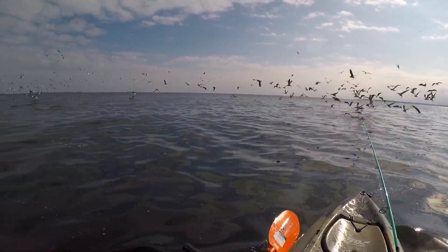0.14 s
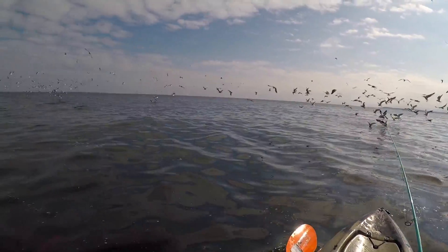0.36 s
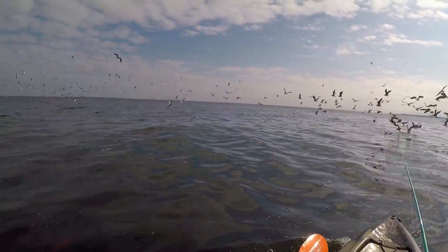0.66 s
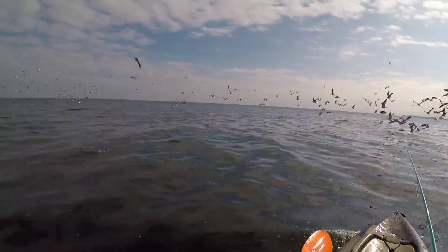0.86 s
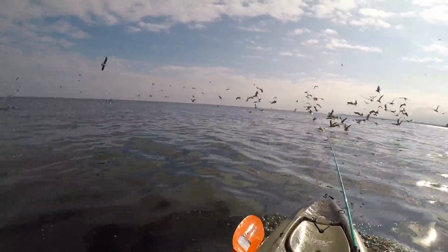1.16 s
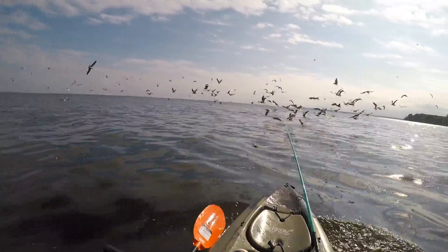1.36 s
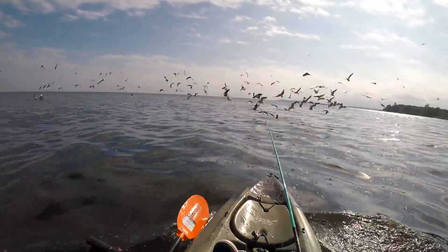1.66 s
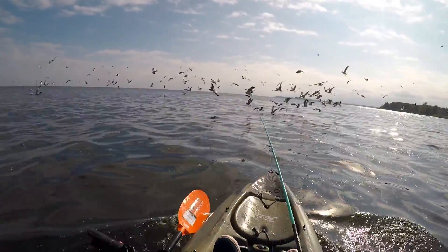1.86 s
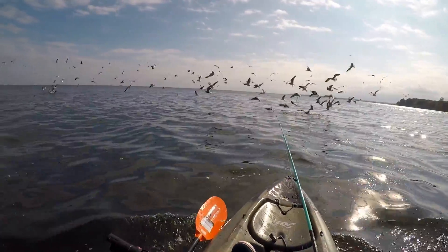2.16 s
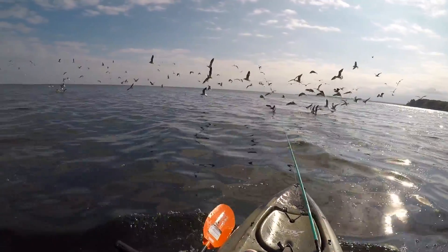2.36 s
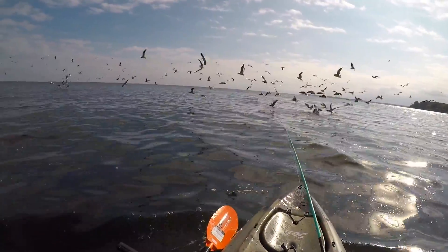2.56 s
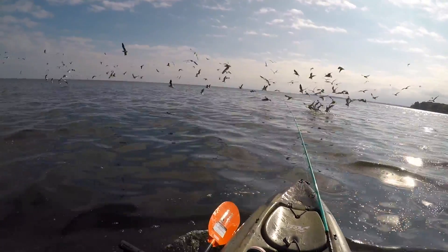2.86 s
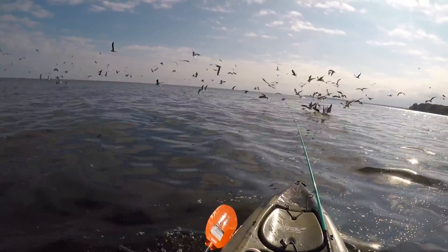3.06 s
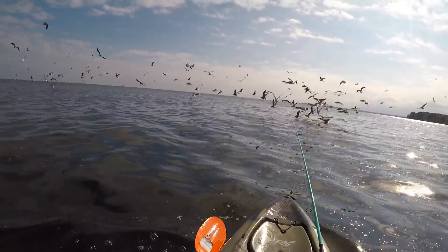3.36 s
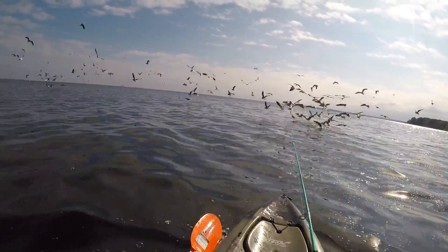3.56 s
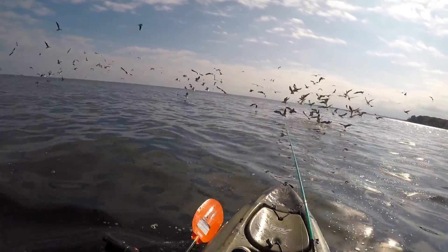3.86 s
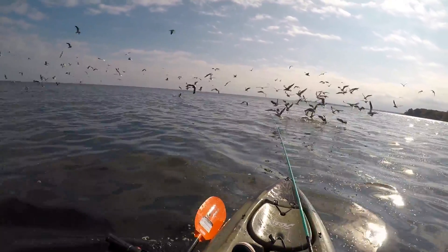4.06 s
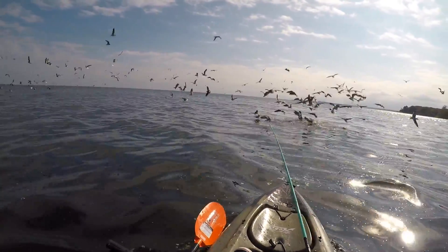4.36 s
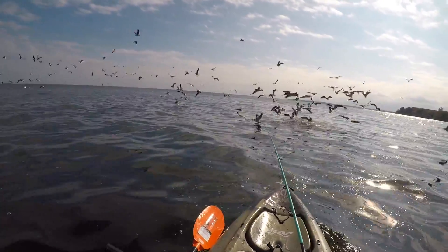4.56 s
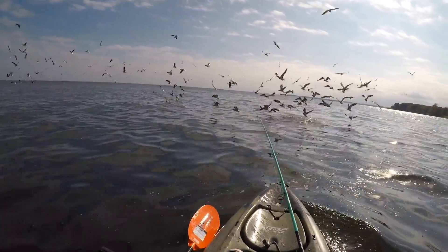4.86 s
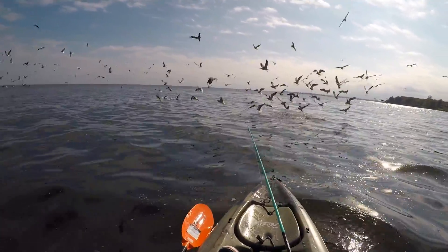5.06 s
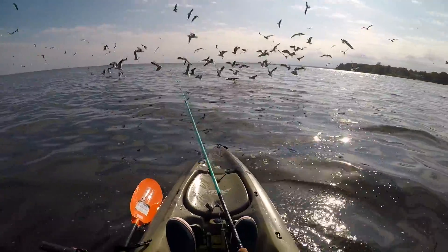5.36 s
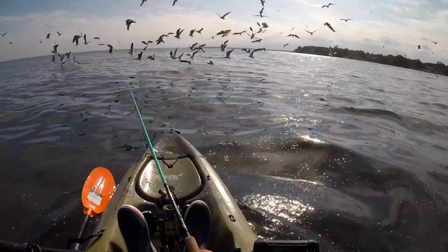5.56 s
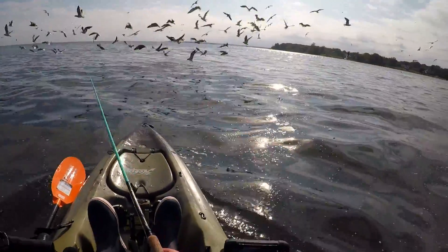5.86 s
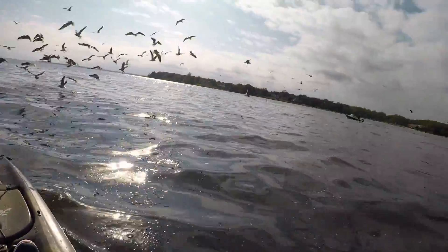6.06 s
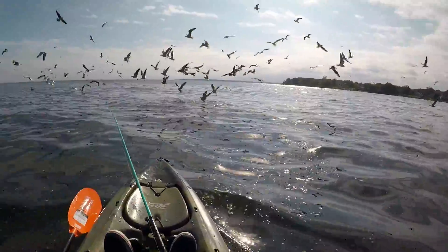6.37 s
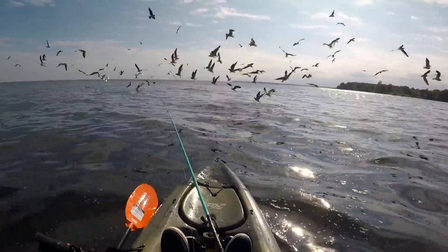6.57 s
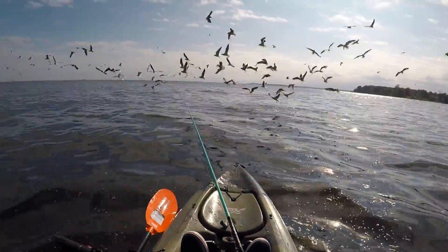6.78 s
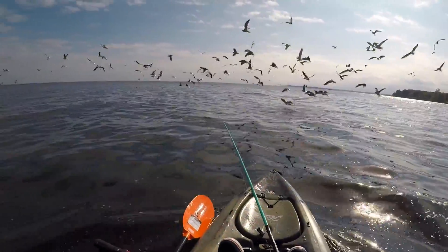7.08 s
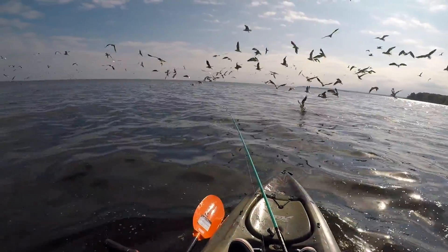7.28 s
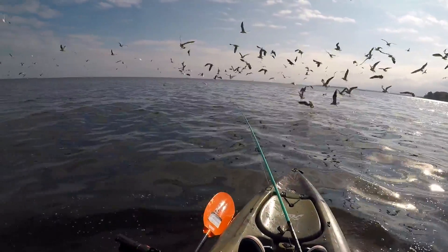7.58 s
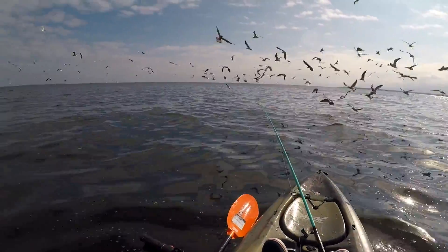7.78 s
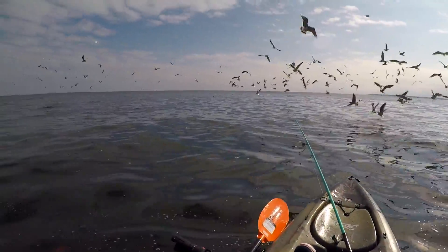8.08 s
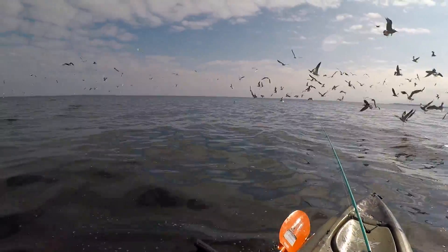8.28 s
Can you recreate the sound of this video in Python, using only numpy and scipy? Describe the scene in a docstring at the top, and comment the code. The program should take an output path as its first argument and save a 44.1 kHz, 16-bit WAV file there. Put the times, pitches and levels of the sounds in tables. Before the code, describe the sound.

A feeding flock of gulls calls continuously over open water, heard from a small boat. Short raspy squawks, piercing squeals and wavering cries overlap nearby, while many fainter birds blur into a swelling chorus behind. Low wind rumble and brief buffeting puffs press on an enclosed microphone, slightly muffling the treble. Faint watery hiss and a few soft hull knocks sit underneath.

```python
"""Gulls cry and rasp close by, over a blurred chorus of the far flock on open water, from a small boat.
Cries are stacks of gliding partials; rasps are uneven pulses ringing the throat; many weak notes of
both kinds make the chorus. Chop and wings are shaped noise, and tackle knocks ring the hull now and then.
Wind rumbles and buffets the two ports of a sealed microphone with noise partly shared, in opposite sense."""
import sys
import numpy as np
from scipy import signal
from scipy.fft import rfft, irfft, next_fast_len
from scipy.io import wavfile
from scipy.ndimage import uniform_filter1d

SR = 44100
rng = np.random.default_rng(int(sys.argv[2]) if len(sys.argv) > 2 else 0)


def ratio_of_db(decibels):
    """Turn decibels (scalar or array-like) into linear amplitude factors; 0 dB maps to 1."""
    return 10 ** (np.asarray(decibels, float) / 20)


def persist_wave(psi):
    """Save psi, clipped to +-1, as 16-bit WAV."""
    counts = np.round(np.clip(psi, -1, 1) * 32767).astype(np.int16)
    wavfile.write(sys.argv[1], SR, np.atleast_2d(counts).T)


N = 371760  # samples in the scene
T = np.arange(N) / SR

# Levels in the bird tables are set ahead of the voice, throat, housing and port colours.
# full-voiced glides: start t/s, length t/s, first f/Hz, last f/Hz, level/dB
FULL_CRIES = [(0.007, 0.06, 1183, 1074, -44.5), (0.328, 0.11, 3500, 3155, -49),
              (0.773, 0.14, 3290, 3320, -50.5), (0.91, 0.12, 1106, 1085, -55.5),
              (1.124, 0.083, 1084, 1080, -48), (1.329, 0.21, 1174, 1076, -54.5),
              (2.175, 0.14, 1065, 1070, -49), (2.456, 0.038, 463, 496, -50.5),
              (2.667, 0.3, 2050, 2120, -56), (3.395, 0.051, 1100, 1130, -53.5),
              (3.728, 0.063, 1920, 2087, -66), (3.817, 0.12, 2160, 2400, -67),
              (4.588, 0.045, 533, 550, -69), (4.73, 0.028, 2368, 2353, -45.5),
              (4.352, 0.036, 529, 577, -56), (4.44, 0.049, 524, 590, -64), (4.909, 0.031, 540, 590, -63),
              (6.567, 0.12, 2780, 2610, -63), (6.93, 0.027, 560, 635, -46),
              (7.007, 0.0312, 1594, 1610, -49), (7.129, 0.12, 3110, 3145, -50.5),
              (7.13, 0.052, 1190, 1155, -56), (7.231, 0.034, 3180, 2910, -39.5),
              (7.463, 0.027, 2340, 2320, -58), (7.472, 0.029, 560, 623, -49.5),
              (7.896, 0.11, 1133, 1070, -53), (8.068, 0.13, 1534, 1530, -59),
              (8.199, 0.065, 1143, 1087, -53.5), (8.283, 0.057, 1484, 1380, -65)]
# single gliding lines, thin whistles and lone strong overtones of fuller cries:
# start t/s, length t/s, first f/Hz, last f/Hz, level/dB
SINGLE_LINES = [(.055, 0.037, 3290, 3160, -45.5), (.1, 0.23, 4800, 4700, -53),
                (.4, 0.11, 2200, 2037, -45.5), (.515, 0.05, 2510, 2366, -49.5),
                (.83, 0.21, 4430, 4680, -49), (.85, 0.29, 2297, 2410, -47.5),
                (1.225, 0.088, 1915, 2150, -39.5), (1.28, 0.039, 4700, 4500, -41),
                (1.31, 0.045, 3553, 3540, -35), (1.32, 0.067, 5870, 5940, -42.5),
                (1.345, 0.038, 4600, 4130, -44), (1.849, 0.1, 2500, 2150, -49),
                (2.015, 0.17, 1957, 1840, -44), (2.18, 0.077, 2400, 2350, -46.5),
                (2.264, 0.042, 3109, 3230, -39.5), (2.961, 0.014, 4200, 4500, -44),
                (3.019, 0.2, 2153, 2077, -46), (3.03, 0.045, 4478, 4470, -53),
                (3.126, 0.15, 2133, 2380, -46.5), (3.135, 0.082, 5710, 5730, -43),
                (3.378, .02, 3000, 2230, -49), (3.4, 0.038, 2190, 2230, -44),
                (3.455, 0.05, 1402, 1360, -49), (3.485, 0.024, 3120, 3450, -45),
                (3.495, 0.045, 2950, 1886, -46), (2.17, 0.15, 5650, 5240, -49),
                (2.17, 0.086, 7050, 6840, -47), (1.645, 0.017, 2500, 2970, -56),
                (1.118, 0.07, 3750, 3650, -47), (1.125, .03, 3150, 3180, -47),
                (7.41, 0.029, 2950, 3000, -48), (2.575, .11, 4880, 4850, -58),
                (2.66, .065, 3200, 3400, -50), (4.77, 0.079, 6850, 7300, -42.5),
                (4.85, .1, 7250, 7250, -48), (5.09, .03, 7000, 6600, -43), (1.13, 0.024, 6200, 6500, -55),
                (1.18, 0.023, 4200, 4600, -43), (1.23, .025, 4600, 4750, -47),
                (1.26, 0.024, 3300, 3570, -42), (1.56, 0.019, 2500, 3330, -54),
                (1.62, 0.051, 1850, 1960, -49), (1.645, 0.025, 3700, 4400, -47),
                (2.53, 0.071, 2750, 2404, -56), (2.555, 0.034, 5400, 4960, -47),
                (2.63, 0.041, 3200, 2860, -50), (2.67, .3, 2060, 2145, -51), (2.71, 0.051, 5150, 5100, -52),
                (3.04, 0.12, 5600, 5925, -44.5), (3.14, 0.06, 6400, 6900, -60),
                (3.2, .095, 2280, 2367, -56), (3.23, 0.081, 3400, 3750, -57),
                (3.32, 0.026, 3000, 3330, -57), (3.385, 0.036, 5900, 5437, -45),
                (3.51, 0.029, 3300, 3020, -56), (3.515, .02, 5600, 4900, -55), (3.62, .02, 2500, 2930, -52),
                (3.79, 0.055, 2600, 2130, -57), (4.02, 0.13, 5150, 5220, -52),
                (4.05, .075, 2250, 2050, -49.5), (5.2, 0.033, 4800, 4340, -44),
                (5.21, 0.021, 3650, 3500, -42), (5.315, 0.038, 3750, 3700, -45),
                (6.445, .025, 4200, 3653, -51), (6.62, .1, 5500, 5000, -55), (6.72, 0.14, 5030, 4950, -56),
                (7.29, 0.1, 6050, 6000, -48), (.965, 0.026, 9100, 9900, -41),
                (3.814, 0.068, 3940, 3810, -52), (4.281, 0.046, 4715, 4300, -36),
                (4.49, 0.078, 3323, 3270, -40), (6.44, 0.035, 2100, 1390, -49),
                (4.499, 0.12, 4020, 3840, -46), (4.67, 0.055, 1310, 1690, -45.5),
                (4.752, 0.046, 3240, 3495, -38), (4.785, 0.19, 3580, 3660, -36.5),
                (5.001, 0.25, 4720, 4530, -45.5), (5.172, 0.081, 3670, 3400, -44.5),
                (5.228, 0.028, 4700, 4050, -36), (5.451, 0.31, 1910, 2190, -49.5),
                (5.635, 0.084, 3220, 2630, -42.5), (5.695, 0.15, 2140, 2020, -51),
                (3.295, 0.025, 2350, 1849, -48), (7.45, 0.29, 4590, 4890, -50),
                (7.72, 0.12, 2683, 2760, -45.5), (7.765, 0.058, 2950, 3400, -46),
                (8.06, 0.045, 2410, 2190, -49), (8.395, 0.043, 4050, 4240, -53)]
# wails that climb, hold and sag: start t/s, length t/s, first f/Hz, top f/Hz, level/dB
CLIMBING_WAILS = [(0.456, 0.16, 5140, 5320, -40.5), (0.772, 0.046, 560, 619, -46.5),
                  (1.591, 0.11, 4700, 4820, -46), (1.654, 0.32, 3430, 3820, -37),
                  (3.339, 0.048, 1480, 1650, -53.5), (4.791, 0.0458, 575.6, 616.5, -45),
                  (3.764, 0.05, 1190, 1324, -51), (5.578, 0.14, 4650, 4800, -48)]
# hoarse screams of smeared partials: start t/s, length t/s, first f/Hz, last f/Hz, level/dB
HOARSE_SCREAMS = [(1.172, 0.073, 1075, 1156, -38.5), (1.841, .13, 1159, 1091, -42.5),
                  (1.98, 0.097, 1100, 996, -52), (2.301, 0.16, 1150, 1097, -62),
                  (2.495, .07, 1100, 1108, -45.5), (2.833, 0.092, 1094, 1072, -46.5),
                  (2.939, 0.049, 1050, 1057, -47.5), (3.04, 0.092, 1090, 1085, -63),
                  (6.568, 0.0606, 1100, 1110, -57), (7.787, 0.103, 1150, 1150, -50),
                  (8.335, 0.094, 985, 1064, -61)]
# long wavering calls of the nearest birds, one list a call: t/s, pitch f/Hz, level/dB
WARBLE_LINES = [
    [(3.24, 3440, -70), (3.28, 3670, -72), (3.33, 3854, -64), (3.438, 3605, -66), (3.53, 3730, -71),
     (3.594, 3580, -67), (3.66, 3200, -71)],
    [(4.39, 3000, -46), (4.42, 3090, -48), (4.44, 3234, -37), (4.49, 3440, -43), (4.532, 3300, -39),
     (4.57, 3207, -86)],
    [(3.67, 3470, -63), (3.678, 3584, -46.5), (3.752, 3439, -57), (3.784, 3240, -47.5), (3.874, 3140, -53),
     (3.93, 3540, -46)],
    [(3.99, 3180, -50), (4.025, 3060, -46), (4.048, 3260, -45), (4.075, 3160, -42.5), (4.108, 3340, -45),
     (4.132, 3030, -36.5), (4.168, 3170, -41.5), (4.195, 3055, -42.5), (4.228, 3140, -43),
     (4.256, 2925, -38), (4.27, 2963, -56)],
    [(4.8, 3070, -62), (4.818, 3180, -65), (4.838, 2926, -70), (4.858, 3094, -65), (4.88, 3410, -49),
     (4.922, 2900, -63), (4.968, 3130, -57), (4.988, 3000, -42), (5.01, 2850, -70)],
    [(4.95, 3625, -66), (4.962, 3490, -40), (5.002, 3280, -37.5), (5.062, 3420, -37), (5.106, 3260, -42.5),
     (5.125, 3090, -52)],
    [(5.59, 3020, -48), (5.63, 2970, -41.5), (5.67, 3410, -41.5), (5.694, 3215, -41), (5.75, 3300, -38),
     (5.764, 3035, -38), (5.778, 3030, -39), (5.83, 2840, -45)],
    [(5.735, 2470, -43), (5.79, 2430, -44), (5.845, 2560, -39), (5.9, 2424, -39.5), (5.958, 2450, -46.5),
     (5.972, 1950, -57), (5.986, 2410, -43), (6.02, 2440, -62)],
    [(6.62, 1105, -59), (6.63, 1095, -55), (6.696, 1123, -58), (6.735, 1090, -58.5), (6.83, 1128, -51),
     (6.89, 1099, -51), (6.925, 1080, -49)],
    [(6.98, 2140, -46), (7.036, 2496, -43), (7.05, 2470, -35.5), (7.064, 2426, -39.5), (7.122, 2420, -46),
     (7.208, 2308, -35.5), (7.27, 2160, -66)],
    [(7.5, 2150, -47), (7.558, 2240, -51), (7.646, 2395, -49), (7.668, 2210, -44.5), (7.696, 2123, -38),
     (7.768, 2360, -46.5), (7.782, 2220, -46), (7.8, 2080, -55)],
    [(7.585, 2550, -68), (7.62, 2990, -51), (7.67, 3150, -50), (7.678, 2990, -52), (7.74, 2810, -46)],
    [(6.19, 4150, -57), (6.225, 4750, -45), (6.33, 4760, -53), (6.39, 4560, -50), (6.41, 4250, -45),
     (6.435, 4300, -67)],
    [(.965, 4700, -54), (.99, 5330, -39), (1.04, 5460, -36), (1.09, 5270, -39), (1.13, 4530, -42)],
    [(4.845, 6100, -37), (4.87, 6467, -38), (4.89, 6400, -43), (4.91, 5760, -37), (4.935, 5730, -45),
     (4.96, 6090, -43), (4.985, 6100, -47), (5.0, 5850, -52)],
    [(6.483, 1150, -58), (6.52, 1440, -53), (6.552, 1500, -60)],
]
# how much each warble favours its lowest partial: level/dB
WARBLE_LOWEST_DB = [14.5, -10, -7, -3.5, 4, -6, -5.5, 0, 13.5, -16, 8, 2, 3.5, -8, 0, 2]
# colour of the partials of cries, single lines and wails: f/Hz, level/dB
CRY_COLOUR = [(500, -11), (1100, -24), (1500, -1), (2200, 0.5), (3300, -0.5), (4500, 3), (6500, 5.5),
              (7600, -12), (11500, -18)]
# colour of the partials of screams: f/Hz, level/dB
SCREAM_COLOUR = [(1100, -23), (2200, -6), (3300, 1.5), (4400, -13.5), (5700, -1), (7000, -9.5),
                 (10500, -32)]
# colour of the partials of warbles: f/Hz, level/dB
WARBLE_COLOUR = [(2300, -20), (3200, 5.5), (4700, 0), (6400, -0.5), (7400, -10.5), (10500, -16),
                 (14500, -29.5)]
# harsh notes: nominal start t/s, nominal length t/s, level/dB, beak opening as treble lift/dB,
# pulse rate at the top of its arc f/Hz
HARSH_NOTES = [(0.21, 0.055, -43, -9, 615), (0.281, 0.052, -34, 2.5, 345), (0.488, 0.027, -45, 2, 678),
               (0.52, 0.068, -46, 15, 435.6), (0.761, 0.13, -46, 11, 596), (0.855, 0.044, -39, 8, 607.6),
               (0.987, 0.14, -48.5, -22, 533), (1.154, 0.16, -36, 5, 596), (1.353, 0.019, -35, -7, 759),
               (1.443, 0.14, -38.5, -0.5, 563), (1.63, 0.023, -56, -6, 347), (1.704, 0.01, -61, -7, 440),
               (1.842, 0.084, -38.5, 2, 352), (1.929, 0.041, -41, -17, 544), (1.984, 0.082, -38, -23, 610),
               (2.12, 0.049, -33.5, -3, 619), (2.294, 0.044, -32.5, -47, 559),
               (2.336, 0.1, -36.5, -45, 581), (2.509, 0.055, -35, 1.5, 431), (2.74, 0.051, -36.5, -7, 565),
               (2.832, 0.057, -33, -1, 524), (3.042, 0.11, -34.5, -5, 568), (3.204, 0.04, -36.5, -6, 398),
               (3.331, 0.084, -43.5, -21, 425), (3.493, 0.14, -41, 4, 541), (3.76, 0.049, -46, 0, 660),
               (3.927, 0.087, -34, 5, 629), (4.06, 0.12, -47, -6, 514), (4.248, 0.05, -36.5, 10, 474),
               (4.345, 0.07, -30, 8.5, 582), (4.585, 0.058, -39.5, 22, 560),
               (4.706, 0.049, -32.5, 1.5, 589), (4.875, 0.085, -32.5, 22, 362.4),
               (5.073, 0.1, -37.5, 1, 552), (5.207, 0.048, -44, 12, 778), (5.3, 0.072, -40, -4, 658),
               (5.39, 0.051, -38.5, -3, 504), (5.524, 0.069, -28.5, 8.5, 560), (5.695, 0.055, -40, 10, 643),
               (5.834, 0.028, -40, -10.5, 558), (6.041, 0.036, -41, 8, 704),
               (6.144, 0.042, -35.5, 5.5, 563), (6.39, 0.032, -39, 24, 586), (6.435, 0.027, -38, 12, 587),
               (6.562, 0.042, -43, -2, 369.5), (6.932, 0.048, -30.5, 6, 589),
               (7.042, 0.091, -42.5, 4.5, 526), (7.208, 0.068, -38, 14, 611.3),
               (7.402, 0.045, -38, 15, 595), (7.752, 0.14, -42, 7, 531), (8.028, 0.07, -46.5, 9, 529.4),
               (8.173, 0.035, -40, 3, 497), (8.354, 0.08, -36.5, 10, 560)]
# throat resonances of a bird of size 1: f/Hz, width of each of two passes f/Hz, level/dB
THROAT_RINGS = [(2150, 700, -3.5), (3300, 535, 0.5), (4193, 515, -1), (5900, 1045, -1), (1250, 2700, -15.5),
                (9300, 2400, -20.5)]
# which side the calling birds are heard on: t/s, left minus right level/dB
CALLING_SIDE = [(0.0, -4), (1.99, 0.5), (2.39, -5), (2.74, 1), (3.08, -1.5), (6.81, 2.5), (7.16, -1.5),
                (7.35, 1), (7.82, -4.5), (8.43, 0)]
# excitement of the far flock: t/s, level/dB
FLOCK_SWELL = [(0.0, -36), (0.3, -47), (0.77, -39), (1.17, -38), (1.5, -43.5), (1.76, -38), (2.54, -34.5),
               (2.6, -39.5), (2.71, -38.5), (2.98, -32.5), (3.57, -47), (3.87, -40.5), (4.25, -36),
               (4.55, -44), (5.05, -35), (5.4, -43.5), (5.71, -35.5), (6.1, -50), (6.3, -42.5), (6.81, -47),
               (7.2, -44), (7.31, -45), (7.47, -44), (7.65, -49.5), (8.05, -50.5), (8.43, -38)]
# knocks on the hull: t/s, ring level/dB, tick level/dB, left minus right level/dB
HULL_KNOCKS = [(1.707, -53, -110, -9), (2.571, -70, -54.5, 9), (3.54, -41.5, -94, -0.5),
               (4.25, -76, -47.5, -12), (4.619, -48.5, -108, -4), (4.879, -53, -100, -10),
               (5.034, -57, -70, 0)]
# spectrum of chop and wings: f/Hz, level/dB
WATER_SPECTRUM = [(500, -2.5), (900, -9), (1500, -3), (2500, -7), (6000, -13), (7000, -14), (8000, -40)]
# wind: t/s, gust strength level/dB, left minus right level/dB
GUSTS = [(0.0, -40, -1), (0.33, -50.5, 7.5), (1.74, -46.5, 4.5), (1.85, -43, 9.5), (1.95, -57, -4.5),
         (2.13, -53.5, 3.5), (2.93, -55, -0.5), (3.26, -40, 4.5), (3.4, -43.5, -7.5), (3.451, -43, 4.5),
         (3.66, -36.5, 1), (4.3, -54, -2), (5.12, -60, -4), (5.94, -48.5, -10.5), (6.01, -52, 7),
         (6.171, -42.5, 1.5), (6.861, -53.5, -5.5), (6.879, -48, 1), (7.27, -42.5, 3), (7.31, -34, 1),
         (7.58, -36, 1), (7.63, -51, 2), (8.19, -39.5, -4.5), (8.43, -41, 8)]
# spectrum of the turbulence, before it is split into rumble and buffeting: f/Hz, level/dB
TURBULENCE = [(12, -55), (20, -7.5), (54, 4), (100, 0.5), (192, -9), (401, -22.5), (574, -31.5), (706, -42),
              (912, -43), (1200, -55), (1560, -70), (2640, -120)]
# the housing muffles the treble of rasps and chorus: f/Hz, level/dB
HOUSING = [(300, -13), (900, -1.5), (1500, -2), (6500, -3), (7000, -1.5), (8000, -9), (9500, -16.5),
           (11500, -23), (16000, -38)]
# the housing shades the ports unevenly: f/Hz, left minus right level/dB
PORT_SHADING = [(700, -6), (1400, 4.5), (2200, 0.5), (6500, 2), (8500, -17.5), (11000, -12), (13000, 7.5)]
# phase between the two channels after the recorder's stereo processing: f/Hz, left lead phase/rad
CHANNEL_PHASE = [(0, 1.5), (340, -2.5), (860, -4), (1120, -5.5), (1460, -4.5), (1720, -4.5), (1980, -0.64),
                 (2580, 1.2), (2930, -0.23), (4570, -1.5), (4910, 1.14), (5250, -0.14), (6630, 0.03),
                 (7490, -0.7)]

ATTACK, RELEASE, ONSET_DB, TAIL_DB = .25, .3, -7, -8  # shares of a glide's length, level at its ends
CLIMB, HOLD, SAG = .25, .3, 1.15  # shares of a wail's length, its fall as a multiple of the climb
THIN_WAIL_HZ = 3000  # wails that start above this are thin
LEAD_IN = .006  # s a cry starts ahead of its pitch line
WAVER, WAVER_HZ = 0.0073, 152  # pitch tremble as a share, and its rate
HOARSE, HOARSE_HZ = .035, 420  # the same for a scream
WOBBLE = 0.0047  # scatter along the pitch line, share of the pitch
ROLL_OFF_DB, UNEVEN_DB = -0.75, 2.5  # each partial against the one below; scatter between partials
THIN_DB, SILENT_DB = -15, -36  # overtones of a thin voice; partials weaker than this stay silent
FAR_RASPERS, FAR_RASP_DB = 280, -3.5  # hoarse far notes, and their level in the chorus
FAR_WHISTLERS, FAR_WHISTLE_DB = 130, -10  # thin far swoops, and their level in the chorus
HULL_HZ, HULL_WIDTH_HZ = 560, 540
WATER_DB = -52
RUMBLE_DB, RUMBLE_FOLLOWS = -34.5, 0.29  # at the reference gust; dB per dB, it swells less than the buffeting
MEAN_GUST_DB = -48.5  # reference gust
GUST_HISS_DB, GUST_BRIGHTENS = -75, 2.4  # strong gusts reach higher: at the reference gust; dB per dB


def near_cries():
    """The clear cries that stand out, from single gliding lines to hoarse screams and long warbles."""
    line = np.linspace(0, 1, num=13)
    arch = np.interp(line, [0, CLIMB, CLIMB + HOLD, 1], [0, 1, 1, 1 - SAG])
    out = glides(SINGLE_LINES, line, CRY_COLOUR, thin_above_hz=0)
    out += glides(FULL_CRIES, line, CRY_COLOUR)
    out += glides(CLIMBING_WAILS, arch, CRY_COLOUR, thin_above_hz=THIN_WAIL_HZ)
    out += glides(HOARSE_SCREAMS, line, SCREAM_COLOUR, waver=HOARSE, waver_hz=HOARSE_HZ)
    return out + warbles()


def glides(table, shape, voice, thin_above_hz=np.inf, waver=WAVER, waver_hz=WAVER_HZ):
    """Each note swells, holds and fades along a slightly unsteady pitch line of the given shape."""
    out, share = np.zeros((2, N)), np.linspace(0, 1, num=len(shape))
    swell_db = np.interp(share, [0, ATTACK, 1 - RELEASE, 1], [ONSET_DB, 0, 0, TAIL_DB])
    for s, length, first, second, db in table:
        unsteady = 1 + WOBBLE * rng.standard_normal(len(share))
        hz = (first + (second - first) * shape) * unsteady
        partials_db = partials(hz.mean(), voice, rng.standard_normal(26), thin=first > thin_above_hz)
        note = cry(s + length * share, hz, db + swell_db, partials_db, waver, 3.0, waver_hz)
        add(out, note, max(s - LEAD_IN, 0), side_db(s) + 3.1 * rng.standard_normal())
    return out


def warbles():
    """Long calls follow drawn lines of pitch and level, each with its own weight on the lowest partial."""
    out = np.zeros((2, N))
    for rows, lowest_db in zip(WARBLE_LINES, WARBLE_LOWEST_DB):
        s, hz, db = np.transpose(rows)
        scatter = np.r_[lowest_db / UNEVEN_DB, np.zeros(20)]  # shifts the lowest partial only
        partials_db = partials(hz.mean(), WARBLE_COLOUR, scatter)
        note = cry(s, hz, db, partials_db, waver=0.0055, flutter_db=2.5)
        add(out, note, s[0] - LEAD_IN, side_db(s[0]))
    return out


def cry(s, hz, db, partials_db, waver, flutter_db, waver_hz=WAVER_HZ):
    """A membrane sings a stack of partials; the pitch trembles and each partial flutters in level."""
    t = np.arange(s[0] - LEAD_IN, s[-1] + 0.01, 1 / SR)
    smooth = lambda v: uniform_filter1d(np.interp(t, s, v), size=400)
    pitch = smooth(hz) * (1 + waver * walk(waver_hz, len(t)))
    phase = 2 * np.pi * np.cumsum(pitch) / SR
    stack = np.zeros(len(t))
    for k, partial_db in enumerate(partials_db):
        if partial_db > SILENT_DB:
            flutter = flutter_db * walk(64, len(t))
            stack += ratio_of_db(partial_db + flutter) * np.sin((k + 1) * phase + k * k)
    edge = np.clip(np.minimum((t - t[0]) / 0.004, (t[-1] - t) / 0.012), 0, 1)
    return np.sqrt(2) * stack * ratio_of_db(smooth(db)) * edge


def partials(hz, voice, chance, thin=False):
    """Levels of the partials from the voice colour; a thin voice keeps mainly its first."""
    voice_hz, voice_db = np.transpose(voice)
    at = hz * np.arange(1, int(voice_hz[-1] // hz) + 1)
    db = np.interp(np.log(at), np.log(voice_hz), voice_db)
    db = db + UNEVEN_DB * chance[:len(at)] + ROLL_OFF_DB * np.arange(len(at))
    return np.r_[0, db[1:] + THIN_DB] if thin else db


def near_rasps():
    """The harsh notes that stand out: pulse trains through throats of assorted size and roughness."""
    out = np.zeros((2, N))
    chances = rng.random((len(HARSH_NOTES), 3))
    for (s, length, db, open_db, hz), (rough, bird, side) in zip(HARSH_NOTES, chances):
        note = rasp(length, open_db, hz, jitter=.012 + .035 * rough ** 2, bend=.17, size=.92 + .16 * bird)
        add(out, ratio_of_db(db) * note, max(s - length / 4, 0), side_db(s) + 8 * (side - .5))
    return out


def rasp(length, open_db, hz, jitter, bend, size, late_start=0.):
    """Uneven pulses, climbing in rate then sagging (mainly falling from a late start), ring the throat."""
    count = int(1.6 * length * SR) + 200  # room for the slow fade
    arc = np.sin(np.linspace(.2, 2.3, count) + late_start)
    share = np.linspace(0, 1, count)
    swell = np.clip((share - .08) / .14, 0, 1) * np.clip((1 - share) / .4, 0, 1) ** 1.3
    uneven = 1 + jitter * walk(hz, count) + .02 * walk(40, count)
    phase = np.cumsum(hz * (1 - bend + bend * arc) * uneven) / SR
    wraps = np.flatnonzero(np.diff(np.floor(phase))) + 1
    late = phase[wraps] % 1 * SR / hz  # each pulse is shared between two samples
    pulses = np.zeros(count)
    pulses[wraps], pulses[wraps - 1] = 1 - late, late
    noise = .3 * jitter * rng.standard_normal(count)
    pulses = pulses * ratio_of_db(25 * jitter * walk(hz, count)) + noise
    return level(throat(pulses, open_db, size), 0) * .85 * swell * ratio_of_db(3.2 * walk(60, count))


def throat(x, open_db, size):
    """Rings the steep throat resonances; an open beak lifts the upper ones, a smaller bird has them higher."""
    out = np.zeros(len(x))
    for k, (hz, width, db) in enumerate(THROAT_RINGS):
        lift_db = open_db * np.clip((hz - 4000) / 1500, -.5, .5)
        ring = band(band(x, hz / size, width), hz / size, width)
        out += (-1) ** k * ratio_of_db(db + lift_db) * ring
    return out


def side_db(s):
    """Left minus right dB of the side the calling birds are heard on."""
    return np.interp(s, *np.transpose(CALLING_SIDE))


def far_gulls():
    """Weak far notes blur into a chorus that swells with the excitement of the flock."""
    swell_db = np.interp(T, *np.transpose(FLOCK_SWELL))
    return (far_rasps() + far_swoops()) * ratio_of_db(swell_db + 3.0 * walk(45, N))


def far_rasps():
    """Many weak, hoarse notes at random, low and high, some mainly falling."""
    out = np.zeros((2, N))
    for turn, (when, pitch, long, bend, size, side, kind) in enumerate(rng.random((FAR_RASPERS, 7))):
        if kind < .4:  # low notes
            hz, length, jitter = 420 + 300 * pitch, 0.0309 + 0.065 * long, .02
        else:
            hz, length, jitter = 950 + 500 * pitch, .05 + .22 * long ** 2, .012
        note = rasp(length, 12 * (bend - .5), hz, jitter, .06 + .3 * bend ** 2, .9 + .2 * pitch,
                    late_start=1.1 * (size > .5))
        s = (turn + when) / FAR_RASPERS * (N - 1) / SR
        add(out, note * ratio_of_db(-9 * np.abs(2 * size - 1)), s, 9 * (side - .5))
    return level(out, FAR_RASP_DB)


def far_swoops():
    """Thin far cries at random that arch, rise or fall across each other."""
    out, share = np.zeros((2, N)), np.linspace(0, 1, num=9)
    for turn, (when, pitch, long, glide, arch, size, side) in enumerate(rng.random((FAR_WHISTLERS, 7))):
        bend = 1 + .3 * (glide - .6) * share + .12 * arch * np.sin(np.pi * share)
        hz = 2100 * 2 ** (.85 * pitch) * bend
        swell_db = -8 * size - 8 * (2 * share - 1) ** 4
        partials_db = np.r_[0, -3 - 8 * arch, -14][:int(7000 // hz.max())]
        note = cry((.03 + .2 * long ** 2) * share, hz, swell_db, partials_db, waver=.012, flutter_db=4.0)
        add(out, note, (turn + when) / FAR_WHISTLERS * (N - 1) / SR, 9 * (side - .5))
    return level(out, FAR_WHISTLE_DB)


def knocks():
    """A short blow of tackle rings the hull, with a bright tick on top."""
    out, t = np.zeros((2, N)), T[:SR // 20]
    for s, ring_db, tick_db, pan_db in HULL_KNOCKS:
        noise = rng.standard_normal(len(t))
        blow = noise * np.exp(-t / 0.0079)
        click = noise * np.exp(-t / 0.0009)
        ring = level(band(band(blow, HULL_HZ, HULL_WIDTH_HZ), HULL_HZ, HULL_WIDTH_HZ), ring_db)
        tick = level(band(band(click, 13500, 4000), 13500, 4000), tick_db)
        add(out, ring + tick, s, pan_db)
    return out


def water():
    """Wide hiss of chop and wings: shaped noise, as much to the sides as in the middle."""
    mid, side = colour(rng.standard_normal((2, N)), WATER_SPECTRUM) * ratio_of_db(1.6 * walk(8, N))
    return level(mid + side * np.array([[1], [-1]]), WATER_DB)


def wind():
    """Turbulence at the ports: a deep rumble, and buffeting in puffs, partly shared in opposite sense."""
    s, *columns = np.transpose(GUSTS)
    gust_db, pan_db = (np.interp(T, s, c) for c in columns)
    over_db = gust_db - MEAN_GUST_DB
    air = colour(rng.standard_normal((2, N)), TURBULENCE)
    low = signal.sosfilt(signal.butter(4, 180, fs=SR, output="sos"), air)
    high = signal.sosfilt(signal.butter(4, 180, "high", fs=SR, output="sos"), air)
    high = high - .3 * high[::-1]  # an eddy presses one port as it sucks at the other
    bright = signal.sosfilt(signal.butter(2, 380, "high", fs=SR, output="sos"), high)
    puffs = np.array([walk(14, N) + 1.29 * walk(50, N) for _ in range(2)])
    rumble = level(low * ratio_of_db(0.63 * puffs), RUMBLE_DB) * ratio_of_db(RUMBLE_FOLLOWS * over_db)
    buffeting = level(high * ratio_of_db(3.0 * puffs), 3) * ratio_of_db(gust_db)
    hiss = level(bright * ratio_of_db(4.2 * puffs), GUST_HISS_DB) * ratio_of_db(GUST_BRIGHTENS * over_db)
    return (rumble + buffeting + hiss) * ratio_of_db(np.array([pan_db, -pan_db]) / 2)


def ports(x):
    """Turns the phase between the two channels by frequency, then gives each port its own colour."""
    size = next_fast_len(N)
    hz = np.arange(size // 2 + 1) * SR / size
    lead = np.exp(.5j * np.interp(hz, *np.transpose(CHANNEL_PHASE)))
    left, right = irfft(rfft(x, size) * np.array([lead, lead.conj()]), size)[:, :N]
    shading = np.array(PORT_SHADING)
    return np.array([colour(left, shading * [1, .5]), colour(right, shading * [1, -.5])])


def add(out, x, s, pan_db):
    """Mixes a sound in at a time and a side; the nearer port may hear it a sample or two earlier."""
    for channel, sign in enumerate((1, -1)):
        ahead = sign * np.clip(round(pan_db / 3), -2, 2) / 2
        i = max(int(s * SR - ahead), 0)
        out[channel, i:i + len(x)] += x[:N - i] * ratio_of_db(sign * pan_db / 2)


def level(x, db):
    """Scales to an rms level."""
    return x * ratio_of_db(db) / np.sqrt(np.mean(x ** 2))


def colour(x, points):
    """Filters by a spectrum of f/Hz, level/dB."""
    hz, db = np.transpose(points)
    size = next_fast_len(x.shape[-1])
    axis = np.log(np.arange(size // 2 + 1) * SR / size + 1)
    gain = ratio_of_db(np.interp(axis, np.log(hz), db))
    return irfft(rfft(x, size) * gain, size)[..., :x.shape[-1]]


def band(x, hz, width):
    """One resonance, gain 1 at its centre."""
    return signal.lfilter(*signal.iirpeak(hz, hz / width, SR), x)


def walk(rate, size):
    """Random levels held 1 / rate s and slewed twice; spread near 1."""
    k = int(SR / rate)
    held = np.repeat(rng.standard_normal(size // k + 1), k)
    return 1.3 * uniform_filter1d(uniform_filter1d(held, k), k)[:size]


def scene():
    """Birds, water and knocks reach the ports as sound; wind acts on them directly."""
    muffled = colour(near_rasps() + far_gulls(), HOUSING)
    return ports(near_cries() + muffled + knocks() + water()) + wind()


def roll_off(x):
    """The treble ends steeply here."""
    return signal.sosfilt(signal.butter(12, 15650, fs=SR, output="sos"), x)


def record(dry):
    """Adds a faint hiss of the microphone, the same in both ports, and finishes the mix."""
    hiss = colour(rng.standard_normal(N), [(6000, -22), (10500, -13.0), (15000, -4.0), (16000, -26)])
    mix = dry + level(hiss, -83.5)
    return roll_off(mix)


dry = scene()
out = record(dry)
persist_wave(out)
```